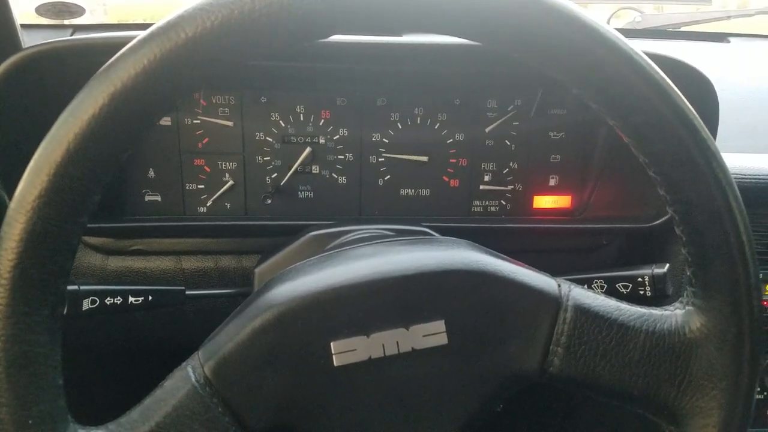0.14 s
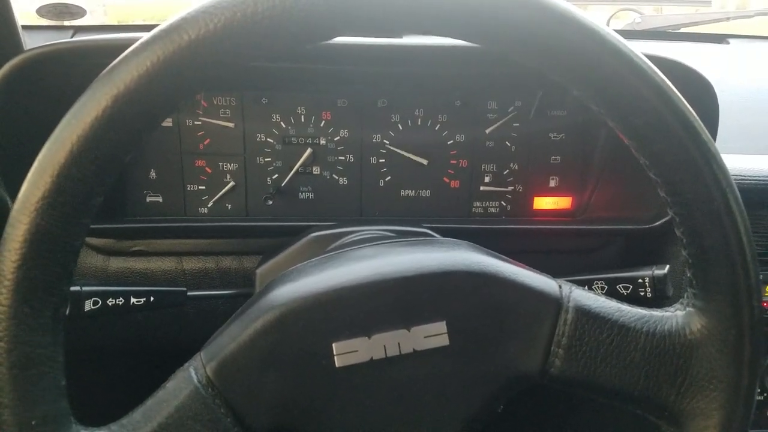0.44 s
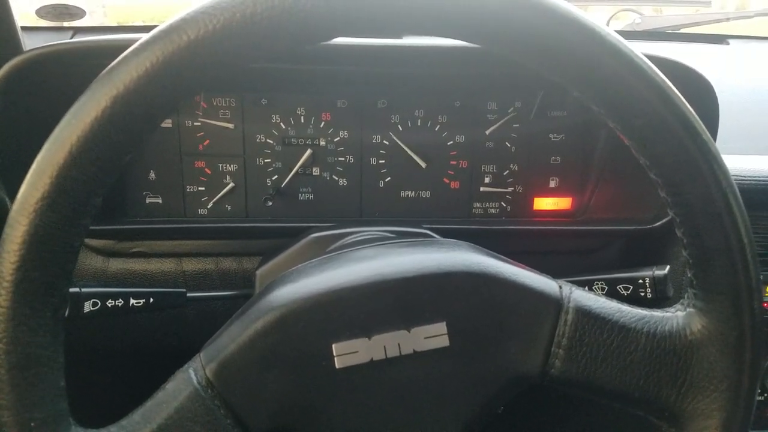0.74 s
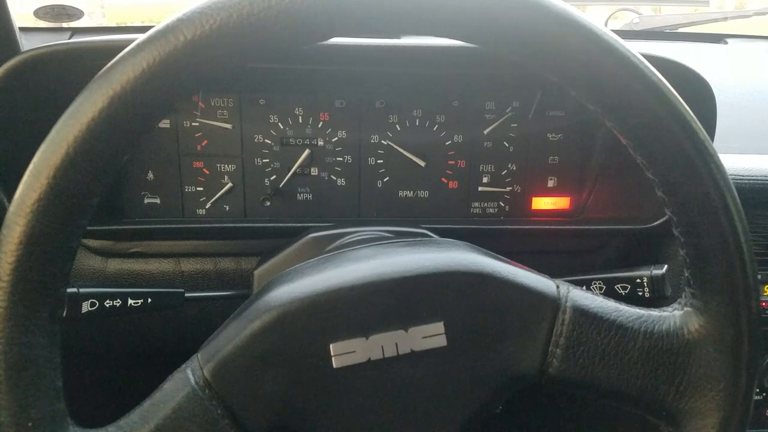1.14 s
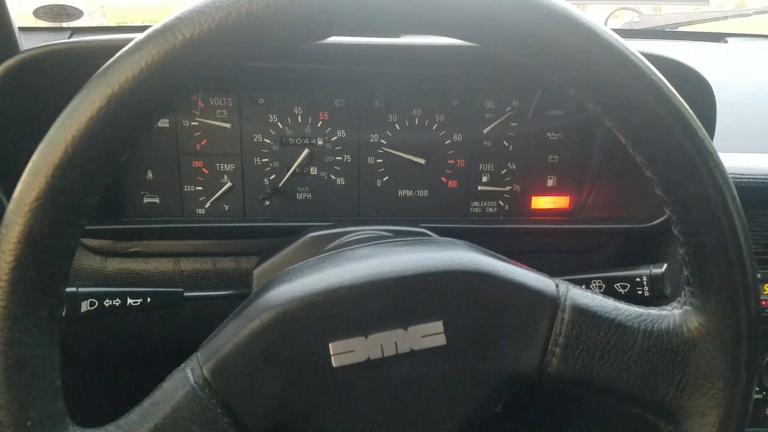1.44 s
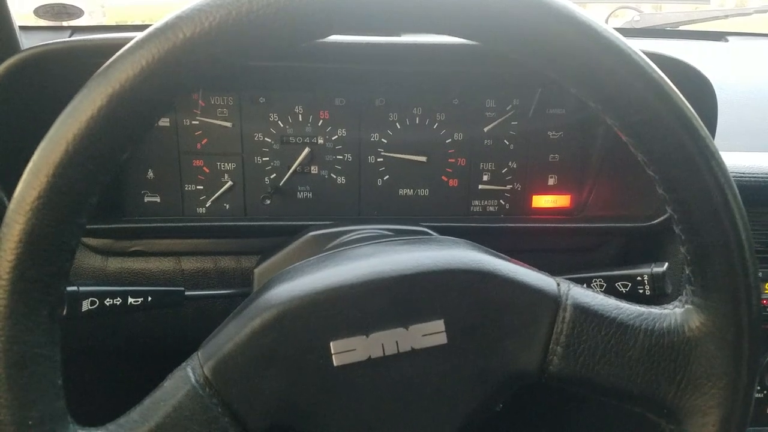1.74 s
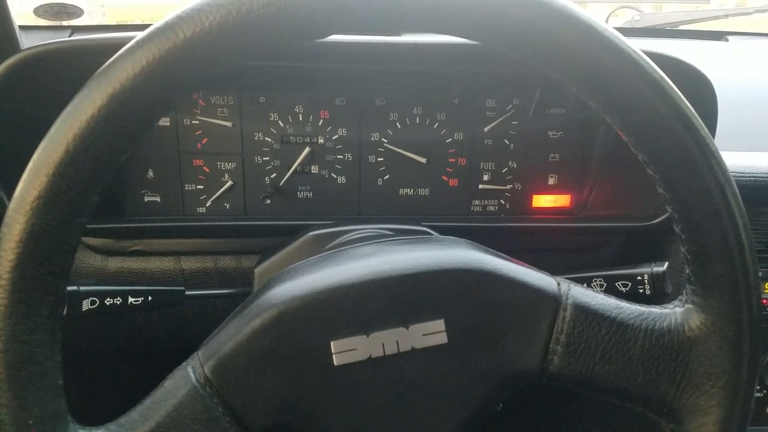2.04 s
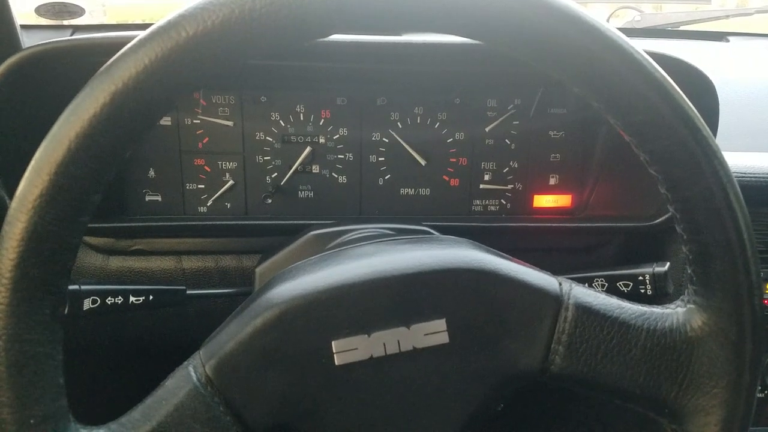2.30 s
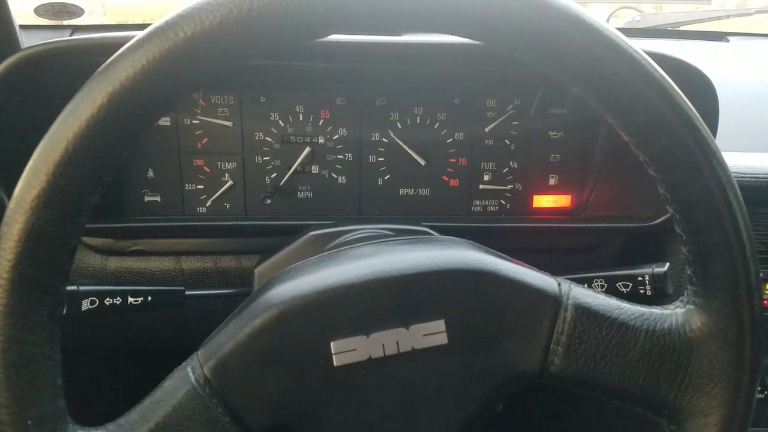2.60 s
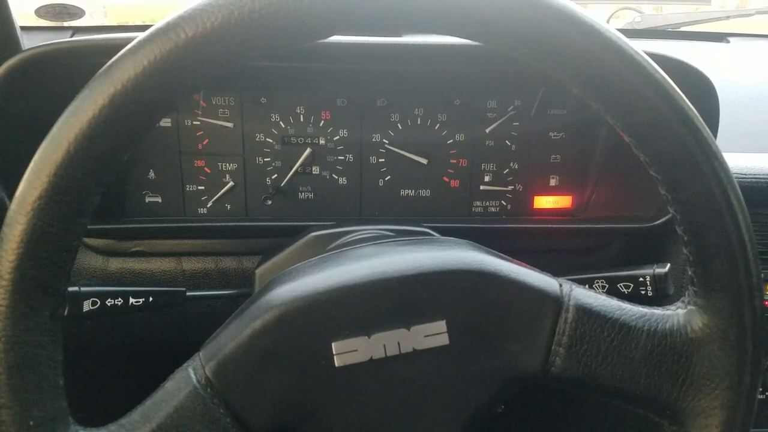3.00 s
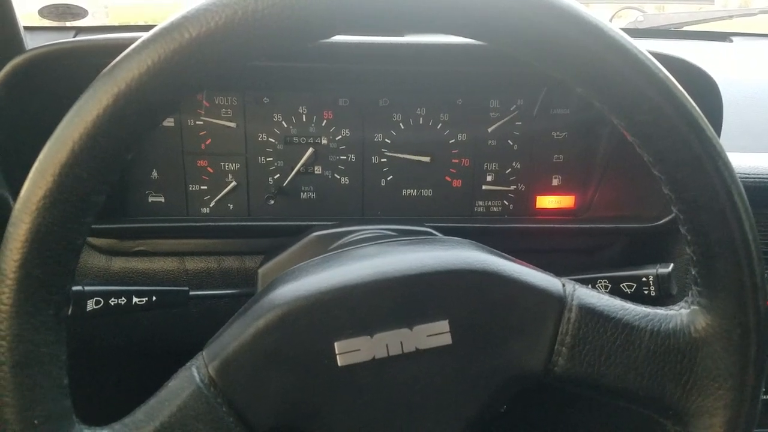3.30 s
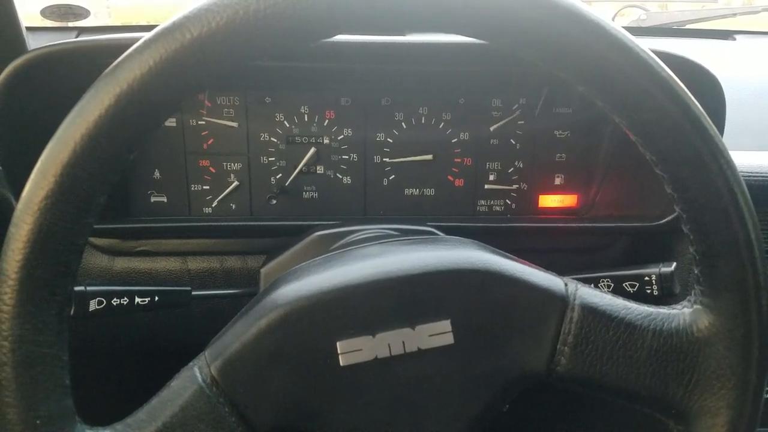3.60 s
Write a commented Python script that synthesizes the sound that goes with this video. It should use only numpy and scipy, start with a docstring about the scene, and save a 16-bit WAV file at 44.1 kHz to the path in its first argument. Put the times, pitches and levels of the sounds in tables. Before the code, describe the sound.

A six-cylinder car engine, heard from the driver's seat, rises and sinks back twice.

```python
"""The driver's seat of a parked car, in close stereo: a six-cylinder petrol engine is blipped twice
from idle. Under throttle the exhaust booms in the cabin; off throttle it burbles unevenly as the revs sink.
Behind the trim the mechanism rustles, ticks and whines, with faint thin rings and a high sizzle.
Near the top of each rev a latch-like clack rings briefly in the padded cabin."""
import sys
import numpy as np
from scipy.fft import rfft, irfft, next_fast_len
from scipy.io import wavfile
from scipy.ndimage import uniform_filter1d, map_coordinates

SR = 44100
rng = np.random.default_rng(int(sys.argv[2]) if len(sys.argv) > 2 else 0)


def materialize(psi):
    """Save the field psi as 16-bit PCM at rate SR to the path in sys.argv[1].

    A 1-D psi becomes a single channel; in a 2-D psi each row is a channel.
    """
    bounded = np.clip(np.atleast_2d(psi).T, -1, 1)
    quanta = np.round(bounded * 32767).astype(np.int16)
    wavfile.write(sys.argv[1], SR, quanta)


N = 165375


def amp(db):
    """Decibels to gain."""
    return 10 ** (np.asarray(db) / 20)


def unit(x):
    """Scale to rms 1."""
    return x / np.sqrt(np.mean(x ** 2) + 1e-20)


def along(points, hz):
    """Read (frequency [Hz], value) points on a log axis."""
    f, v = np.transpose(points)
    return np.interp(np.log(hz + 1), np.log(f + 1), v)


def curve(rows):
    """One value per sample from (time [s], value) rows."""
    return np.interp(np.arange(N) / SR, *np.transpose(rows))


def wobble(rate):
    """A smooth random curve, rate knots a second."""
    return map_coordinates(rng.standard_normal(2048), [np.arange(N) * rate / SR], mode="mirror")


def filtered(x, response):
    """Pass x through a complex response of frequency."""
    m = 2 * next_fast_len(N)
    return irfft(rfft(x, m) * response(np.fft.rfftfreq(m, 1 / SR)), m)[..., :N]


def noise_pair(colour, gain=1):
    """Two unrelated noises, scaled by gain, then coloured."""
    return filtered(rng.standard_normal((2, N)) * gain, lambda hz: amp(along(colour, hz)))


def causal(points, hz):
    """A response with this colour that rings only after it is struck."""
    cepstrum = irfft(np.log(amp(along(points, hz))))
    cepstrum[1:len(cepstrum) // 2] *= 2
    cepstrum[len(cepstrum) // 2 + 1:] = 0
    return np.exp(rfft(cepstrum))


def resonances(rows, hz):
    """Response of a bank of resonances, alternating in sign."""
    return sum((-1) ** k * amp(db) * 1j * hz * width / (centre ** 2 - hz ** 2 + 1j * hz * width)
               for k, (centre, width, db) in enumerate(rows))


def spread(pair):
    """Two unrelated signals to the left and right microphones: bass alike, treble diffuse."""
    # likeness of the cabin sound at the two microphones (frequency [Hz], correlation)
    likeness = [(100,.98),(250,-0.057),(500,0.47),(1000,0.25),(2000,-0.33),(4000,0.068),(8000,-0.16),(14000,0.24)]
    turn = lambda hz: np.arccos(np.clip(along(likeness, hz), -1, 1)) / 2
    mid, side = filtered(pair, lambda hz: np.array([np.cos(turn(hz)), np.sin(turn(hz))]))
    return unit(np.array([mid + side, mid - side]))


def sizzle():
    """A faint high sizzle comes and goes in the background."""
    # swells of the sizzle (time [s], level [dB])
    levels = [(0,-84),(.25,-69),(.4,-82.5),(.9,-77),(1.05,-81),(1.14,-71.5),(1.25,-76.5),(1.34,-68.5),(1.5,-86),(1.58,-64.5),(1.7,-72.5),(2.3,-81.5),(2.46,-75.5),(2.7,-84.5),(2.94,-68.5),(3.05,-78),(3.28,-79),(3.35,-67),(3.5,-72),(3.75,-74)]
    # its colour (frequency [Hz], relative level [dB])
    colour = [(5000,-23.5),(8500,-4.5),(10100,2.5),(10800,-5),(11800,3),(13000,-6),(16000,-12.5)]
    return amp(curve(levels)) * unit(noise_pair(colour))


def singing(waver_rad=0.63, flutter_db=2):
    """Thin rings, perhaps from a pulley, swell and fade."""
    # rings (middle [s], length [s], pitch [Hz], level [dB])
    rings = [(0.067,0.38,1798,-52.5),(0.954,0.12,1810,-47.5),(1.097,.2,2670,-56),(1.869,.08,1770,-53.5),(2.391,.06,2640,-48),(2.941,0.18,2680,-52.5),(3.076,0.086,1803,-51),(3.235,0.077,1781,-51.5),(3.439,.1,1808,-51),(3.646,0.097,1807,-50.5)]
    t = np.arange(N) / SR
    drift, flutter = waver_rad * wobble(45), flutter_db * wobble(40)
    out = np.zeros(N)
    for middle, length, hz, db in rings:
        swell = np.exp(-(2 * (t - middle) / length) ** 2)
        out += amp(db + flutter) * swell * np.sin(2 * np.pi * hz * t + drift)
    return out


def whine(rate, firings, order=6.3, resonance_hz=562, width_hz=40, level_db=-42.5, rising_db=-7):
    """A belt-driven shaft's tone swells as it slides through a resonance, most on the way down."""
    swell = 1 / (1 + ((order * rate - resonance_hz) / width_hz) ** 4)
    rising = uniform_filter1d((np.gradient(rate) > 0) * 1., size=2048)
    rough_tone = np.sqrt(2) * np.sin(2 * np.pi * order * firings + 0.98 * wobble(60))
    return amp(level_db + rising_db * rising) * swell * rough_tone


def rustle(rate, firings, pulsing=0.055, flutter_db=0.84, treble_hz=2710, bright_db_per_octave=1):
    """Behind the trim the mechanism rustles, pulsing with the firings and brightening with speed."""
    # mechanical rustle (time [s], level [dB])
    levels = [(0,-46),(.25,-42.5),(.55,-38.5),(.75,-38),(1.1,-40.5),(1.45,-42),(1.7,-44),(2.0,-40.5),(2.4,-38),(2.9,-42),(3.3,-44),(3.75,-46)]
    # its colour at the seat (frequency [Hz], relative level [dB])
    colour = [(180, -35), (300, -3), (378, -5), (411, -8), (562, -10), (652, -20.5), (756, -9.5),
              (1590, -16), (1750, -13.5), (2400, -16), (2610, -17.5), (3340, -25.5), (3870, -26.5),
              (6790, -39.5), (15500, -48)]
    beat = 1 + pulsing * np.cos(2 * np.pi * firings)
    noise = spread(noise_pair(colour, beat))
    treble = filtered(noise, lambda hz: hz ** 4 / (hz ** 4 + treble_hz ** 4) / (1 + (hz / 7000) ** 4))
    lift = amp(bright_db_per_octave * np.log2(rate / rate.mean())) - 1
    return amp(curve(levels) + flutter_db * wobble(30)) * (noise + lift * treble)


def valve_clatter(firings, level_db=-50, tick_db=5, flutter_db=3, top_hz=5500):
    """Valve ticks, a pulse of noise per firing, ring the panels."""
    # panel modes (frequency [Hz], width [Hz], relative level [dB])
    panels = [(764,53,-9),(1048,20,3.5),(1500,90,-6),(2234,26,-1),(2615,30,-3.5),(3800,250,-24),(4812,110,-19)]
    pulses = amp(tick_db * np.cos(2 * np.pi * firings) + flutter_db * wobble(14))
    ticks = pulses * rng.standard_normal((2, N))
    ringing = filtered(ticks, lambda hz: resonances(panels, hz) / (1 + (hz / top_hz) ** 6))
    return amp(level_db) * spread(ringing)


def latch(attack_s=0.0015, scrape_s=0.0024, crack_t60_s=0.041, cabin_t60_s=0.11,
          ring_db=-7.5, crack_db=-0.5, cabin_db=-10, scatter_db=3.0, pivot_hz=1500):
    """Each contact scrapes for an instant, rings the latch and dies quickly in the padded cabin."""
    # contacts (time [s], relative level [dB], tilt of the ring about pivot_hz [dB/octave])
    contacts = [(0.652,-25,0.5),(0.6553,-20.5,3),(2.2527,-17.5,-0.5),(2.257,-18,-6.5),(2.2722,-29,9),(2.275,-21,-2.5)]
    # latch modes (frequency [Hz], relative level [dB], t60 [s])
    modes = [(673.3,-12,0.067),(790,-8.5,0.12),(929,-3.5,0.08),(1010,-9.5,0.093),(1293,-3,0.08),(1362,-6,0.054),(1496,-6.5,0.052),(1810,-11.5,0.069),(2167,0,0.063),(2385,-8.5,0.064),(2821,-9,0.043),(2990,-17,0.048),(4099,-10.5,0.062),(8150,-20.5,0.033),(9950,-22,0.026)]
    # colour of the scrape (frequency [Hz], relative level [dB])
    colour = [(200,-48),(600,-5),(1000,4),(1400,-1),(2700,0),(4200,-9.5),(5500,-11.5),(7000,-24.5),(8200,-14.5),(9200,-21.5),(10000,-15.5),(11500,-21.5),(15500,-25)]
    t = np.arange(SR // 4) / SR
    ring, noise_power = np.zeros((2, N)), np.zeros(N)
    for start, db, tilt in contacts:
        span = slice(round(start * SR), round(start * SR) + len(t))
        onset = amp(db) * (1 - np.exp(-t / attack_s))
        for hz, level, t60 in modes:
            size, turn = rng.standard_normal((2, 2, 1))  # level and phase vary between the microphones
            mode_db = level + tilt * np.log2(hz / pivot_hz) + scatter_db * size
            tone = np.sin(2 * np.pi * hz * (t + start) + 0.59 * turn)
            ring[:, span] += onset * amp(mode_db - 60 * t / t60) * tone
        scrape = amp(-60 * np.maximum(t - scrape_s, 0) / crack_t60_s)
        cabin_tail = amp(cabin_db - 60 * t / cabin_t60_s)
        noise_power[span] += onset ** 2 * (scrape ** 2 + cabin_tail ** 2)
    crack = np.sqrt(noise_power) * spread(noise_pair(colour))
    return amp(ring_db) * ring + amp(crack_db) * crack


def exhaust_burble(firings, scatter=0.29, jitter_s=0.0012, silencer_hz=202, gas_db=-3.5, cabin_share=0.57):
    """Uneven puffs, rounded by the silencer, leave the pipe with a rush of gas; the cabin drones."""
    # cylinders in firing order (puff strength [ratio])
    cylinders = [1.373, 1.133, 0.86, 0.94, 1.25, 0.98]
    # exhaust colour at the seat (frequency [Hz], relative level [dB])
    pipe = [(15,-26.5),(26,-9.5),(42,-9),(65,-6),(95,8.5),(135,9.5),(165,-9.5),(205,-2),(250,-5),(300,-16.5),(390,-10),(520,-15.5),(700,-35),(1500,-75)]
    # cabin resonances (frequency [Hz], width [Hz], relative level [dB])
    cabin_modes = [(34,10,-1),(54,15,0.5),(86.6,21.5,2),(104.4,7.4,6),(131.9,21,-1.5),(154.6,21.3,-0.5),(180.5,7.2,1),(210.7,19.4,-2),(260,30,-7),(388,8.1,-8.5),(444,17.3,-7),(548.6,74,-13)]
    # burble (time [s], level [dB])
    levels = [(0,-23.5),(.1,-28.5),(.3,-23.5),(.6,-27.5),(.95,-24),(1.25,-28),(1.47,-27),(1.56,-27.5),(1.66,-29),(1.85,-26),(2.2,-23),(2.5,-26),(2.9,-25.5),(3.05,-26.5),(3.22,-30.5),(3.29,-26.5),(3.5,-28.5),(3.75,-27)]
    at = np.flatnonzero(np.diff(np.floor(firings)) > 0)
    chance = rng.uniform(-0.99, 1, (1024, 2))[:len(at)]
    unevenness = np.resize(cylinders, len(at)) - np.mean(cylinders) + scatter * chance[:, 0]
    at = np.clip(at + jitter_s * SR * chance[:, 1], 0, N - 1).astype(int)
    puffs = unit(np.bincount(at, unevenness, N) / np.sqrt(np.gradient(firings)))  # same power at any revs
    rounded = filtered(puffs, lambda hz: 1 / (1 + (hz / silencer_hz) ** 6))
    drive = rounded + amp(gas_db) * rng.standard_normal(N)
    direct = unit(filtered(drive, lambda hz: causal(pipe, hz)))
    ringing = unit(filtered(drive, lambda hz: resonances(cabin_modes, hz)))
    return amp(curve(levels)) * unit(np.sqrt(1 - cabin_share) * direct + np.sqrt(cabin_share) * ringing)


def firing_note(rate, firings, revving_db=-42.5, revving_hz=76.5, idle_db=-39.5, idle_hz=63):
    """The firing note booms in the cabin, with its octave and the half-rate throb of the two banks."""
    # firing note (time [s], level [dB])
    boom_levels = [(0,-23),(.12,-61),(.18,-23.5),(.29,-24.5),(.4,-11.5),(.52,-13),(.68,-18.5),(.81,-35),(.88,-22),(1.2,-24.5),(1.4,-28),(1.5,-41),(1.72,-38),(1.82,-24),(1.9,-24),(2.0,-11.5),(2.16,-14),(2.33,-21.5),(2.44,-31),(2.57,-21),(2.9,-24),(3.02,-41),(3.75,-34)]
    # throb of the cylinder banks (time [s], level [dB])
    throb_levels = [(0,-65),(.25,-28),(.35,-25.5),(.5,-22),(.63,-23.5),(.72,-49),(.85,-28.5),(1.05,-23.5),(1.25,-26),(1.45,-32.5),(1.75,-51),(1.9,-25.5),(2.15,-24.5),(2.32,-42),(2.42,-24.5),(2.72,-24),(2.9,-25),(3.05,-33.5),(3.75,-51)]
    boom = amp(curve(boom_levels) - 0.86 * wobble(38)) * np.sin(2 * np.pi * firings)
    throb = amp(curve(throb_levels) + 0.76 * wobble(25)) * np.sin(np.pi * firings)
    revving = amp(revving_db) / (1 + (revving_hz / rate) ** 10)
    idling = amp(idle_db) / (1 + (rate / idle_hz) ** 10)
    octave = (revving + idling) * amp(2 * wobble(20)) * np.sin(4 * np.pi * firings)
    return np.sqrt(2) * (boom + throb + octave)


def scene():
    """One crankshaft drives the engine layers; rings, sizzle and clacks keep their own time."""
    # two blips of the throttle (time [s], firing rate [Hz])
    revs = [(0.0, 42.2), (0.09, 46.2), (0.26, 78.35), (0.3, 86.9), (0.41, 105.4), (0.53, 120),
            (0.67, 135.7), (0.76, 134.2), (1.13, 103.0), (1.49, 74.73), (1.61, 62.23), (1.7, 56.6),
            (1.77, 62.52), (1.94, 92.54), (1.99, 101.1), (2.17, 125.1), (2.29, 138.5), (2.38, 135.8),
            (2.58, 118.4), (2.91, 91.43), (3.24, 66.44), (3.45, 51.72), (3.51, 50.74), (3.6, 46.56),
            (3.75, 42.9)]
    rate = uniform_filter1d(curve(revs), size=2205)
    firings = np.cumsum(rate) / SR  # running count
    exhaust = firing_note(rate, firings) + exhaust_burble(firings)
    mechanism = whine(rate, firings) + rustle(rate, firings) + valve_clatter(firings)
    return exhaust + mechanism + singing() + sizzle() + latch()


def record(dry, low_cut_hz=25, top_hz=15900, fade_s=0.004):
    """Each microphone at the seat has its own colour; the deepest bass and the top are cut."""
    # balance of the microphones (frequency [Hz], left over right [dB])
    balance = [(200,-1.78),(600,-2),(1500,-1.2),(4000,-0.5),(8000,0.5),(10000,-3.5),(12500,1.5)]
    t = np.arange(N) / SR
    fades = np.clip(np.minimum(t, t[-1] - t) / fade_s, 0, 1)
    colour = lambda hz: amp(along(balance, hz) * np.array([[.5], [-.5]]))
    band = lambda hz: hz ** 4 / (hz ** 4 + low_cut_hz ** 4) * (hz < top_hz)
    return filtered(dry * fades, lambda hz: colour(hz) * band(hz))


dry = scene()
out = record(dry)
materialize(out)
```